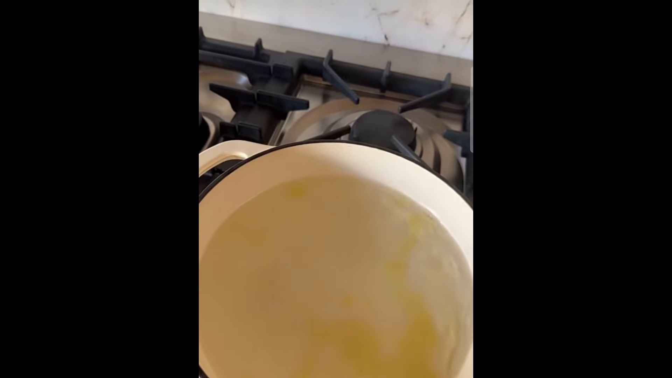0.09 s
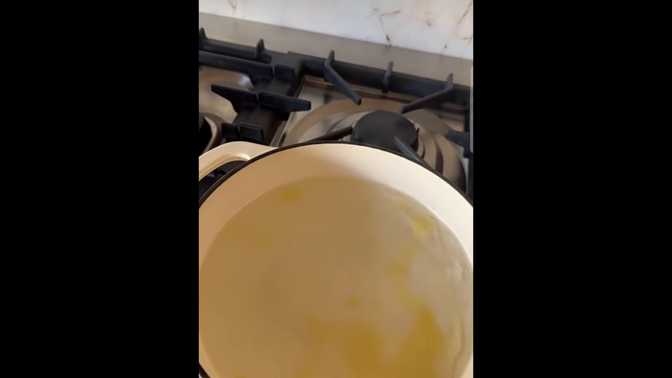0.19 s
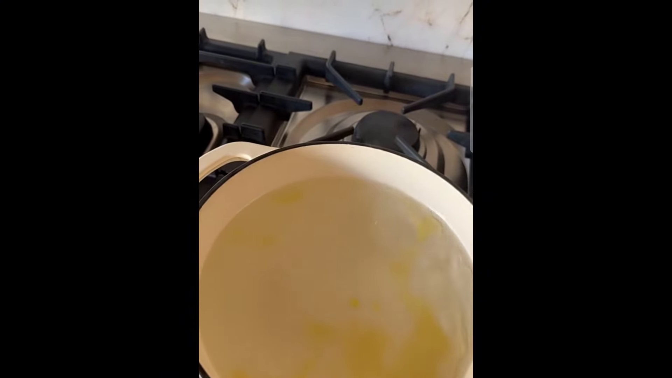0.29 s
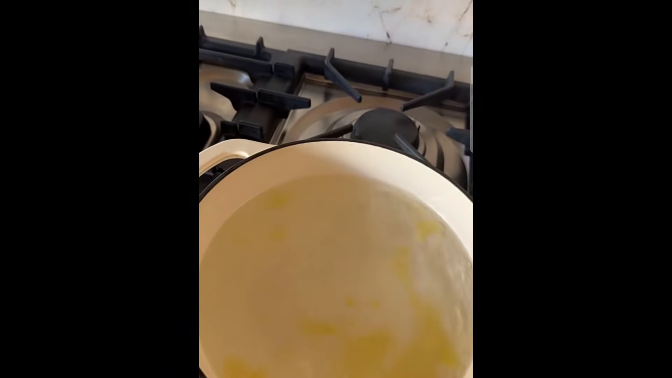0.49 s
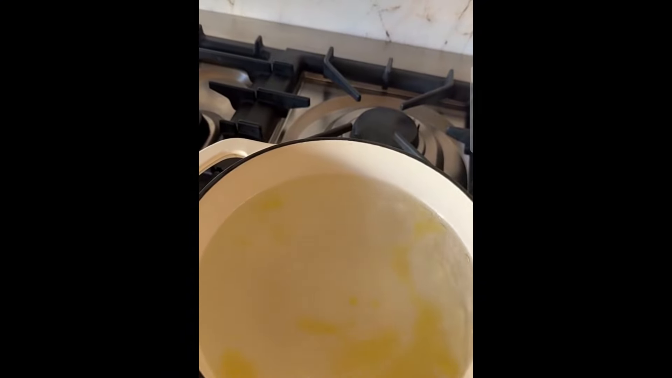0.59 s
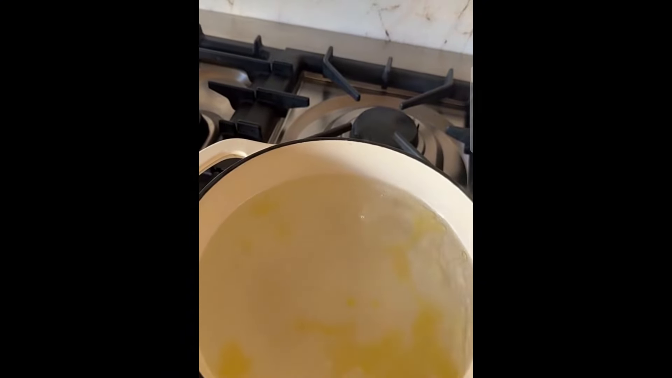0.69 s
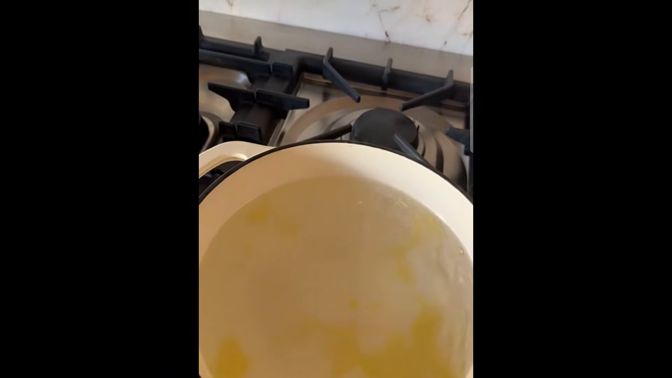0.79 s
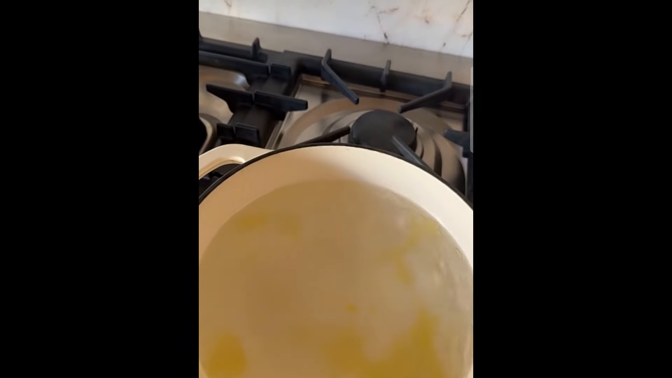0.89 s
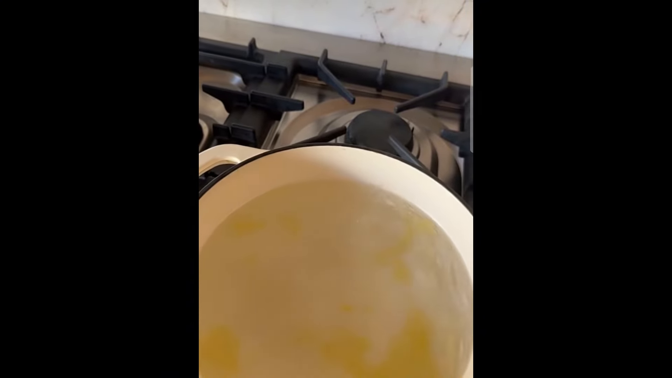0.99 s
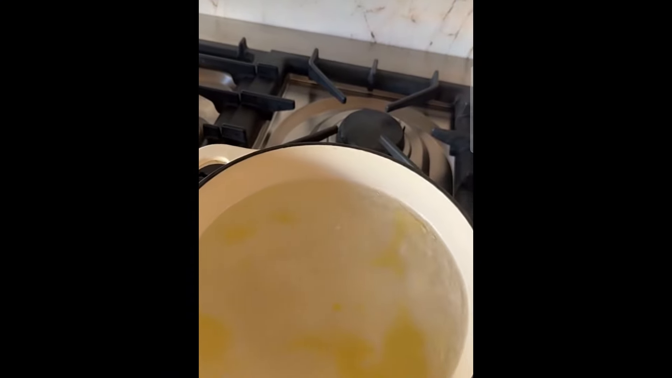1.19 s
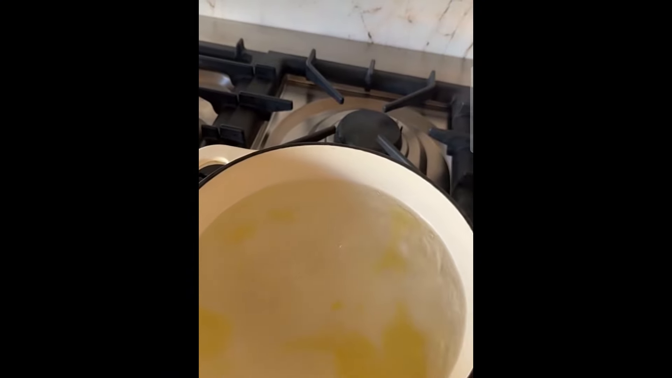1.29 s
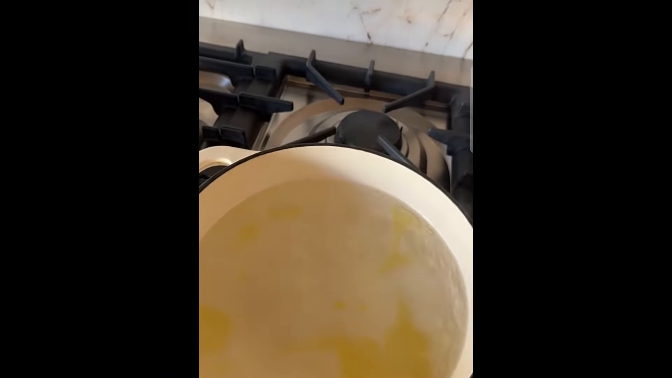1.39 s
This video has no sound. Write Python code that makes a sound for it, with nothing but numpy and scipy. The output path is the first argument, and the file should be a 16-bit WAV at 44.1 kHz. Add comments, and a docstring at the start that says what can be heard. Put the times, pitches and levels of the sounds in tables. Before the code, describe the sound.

A very faint, steady gas flame rush opens. At about 0.25 s a loud, sharp knock lands, full of midrange thud and bright crack, then a duller rebound at 0.32 s. A much softer bump settles at 0.46 s. The hollow ringing and low boom fade in a small kitchen, leaving faint ticks, thin quiet whistles and weak taps near 0.9 and 1.2 s.

```python
"""A lit gas ring is heard first, rushing steadily under a pot in a small kitchen: noise bands and resonances.
A hard object is then knocked down, drops back once and settles with a soft bump: decaying sines for body,
thud and low boom, with shaped noise and crowded tones for crack, dense ringing and room tail.
Light taps, faint high ticks and thin, quiet whistles are resonant noise under envelopes.
One microphone takes it all in; distance is heard only as level and room tail."""
import sys
import numpy as np
from scipy import signal
from scipy.fft import irfft
from scipy.io import wavfile

SR = 44100
rng = np.random.default_rng(int(sys.argv[2]) if len(sys.argv) > 2 else 0)


def master(y):
    """Save y as 16-bit WAV."""
    cut = np.clip(np.atleast_2d(y).T, -1, 1)
    pcm = np.round(cut * 32767)  # scale
    wavfile.write(sys.argv[1], SR, pcm.astype(np.int16))


N = 61740
TIME = np.arange(N) / SR
CENTRES_HZ = 1000 * 2 ** (np.arange(-30, 25) / 6)  # sixth-octave steps

# Gas ring spectrum: [f/Hz, level/dB per third octave]
FLAME = [(30, -93), (50, -66), (80, -57), (125, -58.5), (200, -64), (340, -55), (500, -61.5), (800, -57),
         (1150, -64), (1500, -51), (1900, -56), (2500, -63.5), (3200, -65), (4800, -71.5), (7200, -71.5),
         (10500, -77.5), (15000, -72.5)]
# Resonances in the burner's rush: [f/Hz, filter width/Hz, level/dB]
FLAME_RESONANCES = [(1582, 65, -59), (1903, 49, -58), (5764, 83, -72), (7320, 900, -71.5),
                    (9360, 1200, -75), (13800, 400, -78)]
# Slow drift of the whole rush: [t/s, relative level/dB]
FLAME_LEVEL = [(0, 1), (.5, 1), (.72, 0.5), (.86, -2), (1.0, -1), (1.18, -0.5), (1.27, -1.5), (1.4, -0.5)]
FLAME_FLICKER_DB = 3.08  # standard deviation at each flicker point

# Thin whistles: [middle t/s, length/s, f/Hz, filter width/Hz, level/dB]
WHISTLES = [(0.595, 0.089, 3120, 35, -53), (1.087, 0.22, 3340, 69.4, -60), (1.117, 0.24, 1540, 58.4, -52)]

# Faint ticks: [t/s, snap level/dB, t60/s, high ring level/dB]
TICKS = [(0.683, -44.5, 0.027, -44), (0.7975, -42, 0.01, -57), (1.07, -46, 0.034, -60),
         (1.078, -57, 0.33, -67), (1.1176, -46, 0.053, -43.5), (1.170, -62, 0.044, -56.5),
         (1.259, -55, 0.043, -55), (1.27, -57, 0.15, -61), (1.292, -55, 0.022, -55.5)]
# Colour of the tick's snap: [f/Hz, relative level/dB per third octave]
TICK_COLOUR = [(2000, -26), (3500, -3), (5500, -5), (8000, -1), (11000, -1.5), (15000, 7)]
TICK_RING_HZ, TICK_RING_WIDTH_HZ, TICK_RISE_S = 6930, 510, 0.00047

# Light taps: [t/s, f/Hz, level/dB, t60/s]
TAPS = [(0.463, 850, -33.5, 0.13), (0.889, 862, -41, 0.064), (1.188, 330, -34, 0.084)]
TAP_WIDTH_HZ, TAP_RISE_S = 47, 0.0054

# Blows: [t/s, thud and dense ringing level/dB, contact brightness f/Hz, crack level/dB,
#         mode ring level/dB, boom level/dB]; levels are relative to the tables below
BLOWS = [(0.2474, 1, 14000, 4, 2, 1), (0.3246, -2, 736, 1, -2, -2), (0.4647, -19, 1080, -16.5, -23, -11)]

# Crack of a contact: [f/Hz, level/dB per third octave]
CRACK = [(200, -33), (1000, -21.5), (2300, -32), (3200, -50), (6000, -33), (8000, -36), (15000, -54)]
CRACK_T60_S = 0.014
CRACK_DULL_DB_PER_OCTAVE, CRACK_DULL_FROM_HZ = 8, 4200  # softer, later contacts lose their top

# Dense ringing and room tail: [f/Hz, early level/dB, tail level/dB], per third octave
DENSE = [(40, -67, -78), (133, -31.5, -34), (278, -26, -37.5), (650, -18, -27.5), (1090, -25, -27.5),
         (2120, -21.5, -29), (2445, -16, -30), (2850, -32, -47), (4300, -28, -40.5), (4520, -37, -50.5),
         (5800, -32.5, -52.5), (7270, -46, -53), (9200, -35, -50.5), (10900, -46, -69), (15000, -46, -57)]
# Decay of the kitchen's tail: [f/Hz, t60/s]
ROOM_T60 = [(100, 0.4), (500, 0.67), (1500, 0.33), (4000, 0.82), (12000, 0.63)]
EARLY_T60_S, EARLY_RISE_S, TAIL_RISE_S = 0.13, 0.0027, 0.021
CROWD_SHARE, CROWD_SPREAD_DB = 0.45, 1.5  # power share held in scattered modes; spread of their strengths
BASS_LAG_S, BASS_LAG_BELOW_HZ = 0.00902, 398.3  # slow bending waves delay the bass of the ringing

# Modes of the knocked body: [f/Hz]
MODE_HZ = [239, 347, 468, 571, 613, 639, 783, 820, 970, 1372, 1753, 1906, 2238, 3812, 4027, 4288, 5250,
           5997]
# Strength and decay of those modes, in turn: [first blow level/dB, later blow level/dB, t60/s]
MODES_OF_BODY = [(-24.5, -36, 0.073), (-22, -17.5, 0.12), (-19.5, -20, 0.2), (-44, -41, 0.15),
                 (-17.5, -42, 0.48), (-33, -19.5, 0.37), (-27.5, -20.5, 0.34), (-14, -32, 0.1),
                 (-31, -29, 0.25), (-24, -23, 0.28), (-35, -29, 0.21), (-17, -30, .24), (-43.5, -57, 0.53),
                 (-40, -58, 0.2), (-33, -62, 0.15), (-26.5, -36, 0.11), (-37, -45, 0.13),
                 (-23.5, -58, 0.051)]
# Short, broad thud whose low waves arrive later: [f/Hz, first blow level/dB, later blow level/dB, t60/s, lag/s]
THUD = [(238.5, -2, -13.5, 0.027, 0.00695), (336.6, -0.5, 3, 0.032, 0.0061), (553, -5, 5.5, 0.014, 0.0019),
        (864, -6, -38, 0.013, 0.00061), (1796, 1, -27, 0.0074, 0.00026), (2310, -5, -33, 0.0072, .0002)]
THUD_RISE_CYCLES = 1.42
# Low boom that builds up slowly: [f/Hz, level/dB, t60/s]
BOOM = [(82, -7, 0.17), (94.44, -15, 0.35)]
BOOM_RISE_S = 0.05

CUTOFF_HZ = 15900


def from_db(db):
    """Decibels to gain."""
    return 10 ** (np.asarray(db) / 20)


def rms_one(x):
    """Scale to unit power."""
    return x / np.sqrt(np.mean(x ** 2) + 1e-20)


def at_hz(points, hz, column=1):
    """Read a table on a log-frequency axis."""
    table = np.array(points)
    return np.interp(np.log(hz), np.log(table[:, 0]), table[:, column])


def band_noise(low, high):
    """Steep-sided noise between two edges, rms 1."""
    sos = signal.butter(3, [low, high], "band", fs=SR, output="sos")
    # the extra half second lets the filter settle
    return rms_one(signal.sosfilt(sos, rng.standard_normal(N + SR // 2))[-N:])


def noise_bands():
    """Noise in sixth-octave bands with their centres; unit power per third octave."""
    half_band = 2 ** (1 / 12)
    return [(hz, band_noise(hz / half_band, hz * half_band) / np.sqrt(2)) for hz in CENTRES_HZ]


def resonant_noise(hz, width_hz):
    """Noise twice through one resonance, rms 1."""
    b, a = signal.iirpeak(hz, hz / width_hz, fs=SR)
    once = signal.lfilter(b, a, rng.standard_normal(N))
    return rms_one(signal.lfilter(b, a, once))


def decay(start, t60, rise=1e-4):
    """Envelope that rises with a time constant (s) and dies away by 60 dB per t60 (s)."""
    age = np.maximum(TIME - start, 0)
    return (1 - np.exp(-age / rise)) * from_db(-60 * age / t60)


def ring(start, hz, t60, rise=1e-4):
    """One struck mode: a decaying sine."""
    return np.sin(2 * np.pi * hz * (TIME - start)) * decay(start, t60, rise)


def flame():
    """The burner's rush: noise flickering separately in every band, plus steady resonances."""
    rush = np.zeros(N)
    flicker_times = np.linspace(0, N / SR, num=30)
    for hz, noise in noise_bands():
        flicker = np.interp(TIME, flicker_times, rng.standard_normal(size=30))
        rush += from_db(at_hz(FLAME, hz) + FLAME_FLICKER_DB * flicker) * noise
    for hz, width_hz, db in FLAME_RESONANCES:
        rush += from_db(db) * resonant_noise(hz, width_hz)
    return rush * from_db(np.interp(TIME, *np.transpose(FLAME_LEVEL)))


def whistles():
    """Thin whistles: narrow resonant noise that swells and fades on half a cosine."""
    out = np.zeros(N)
    for middle, length, hz, width_hz, db in WHISTLES:
        swell = np.cos(np.pi * np.clip((TIME - middle) / length, -.5, .5))
        out += from_db(db) * swell * resonant_noise(hz, width_hz)
    return out


def ticks():
    """Tiny bright snaps of coloured noise, each with a short, high resonance."""
    snap = np.zeros(N)
    for hz, noise in noise_bands():
        if hz >= TICK_COLOUR[0][0]:
            snap += from_db(at_hz(TICK_COLOUR, hz)) * noise
    snap = rms_one(snap)
    high_ring = resonant_noise(TICK_RING_HZ, TICK_RING_WIDTH_HZ)
    out = np.zeros(N)
    for s, db, t60, ring_db in TICKS:
        out += decay(s, t60, TICK_RISE_S) * (from_db(db) * snap + from_db(ring_db) * high_ring)
    return out


def taps():
    """Small dull contacts, each a decaying burst of noise through one resonance."""
    out = np.zeros(N)
    for s, hz, db, t60 in TAPS:
        out += from_db(db) * decay(s, t60, TAP_RISE_S) * resonant_noise(hz, TAP_WIDTH_HZ)
    return out


def contact(hz, bright_hz):
    """A softer contact excites less treble."""
    return 1 / np.sqrt(1 + (hz / bright_hz) ** 4)


def bass_lag(hz):
    """How much later (s) the ringing sets in at this frequency: slow bending waves delay the bass."""
    return BASS_LAG_S / np.sqrt(1 + (hz / BASS_LAG_BELOW_HZ) ** 4)


def mode_crowd(centre_hz, count=6):
    """A few steady tones scattered over one band, with the power of that band's noise."""
    spectrum = np.zeros(N // 2 + 1, complex)
    hz = centre_hz * 2 ** (rng.uniform(-1, 1, count) / 12)
    strength = from_db(CROWD_SPREAD_DB * rng.standard_normal(count))
    phase = 2 * np.pi * rng.random(count)
    spectrum[(hz * N / SR).astype(int)] = strength * np.exp(1j * phase)
    return rms_one(irfft(spectrum, N)) / np.sqrt(2)


def clatter():
    """Cracks of contact, the crowd of short modes and the kitchen's tail; ringing of the blows adds in power."""
    out = np.zeros(N)
    earlies = [decay(s, EARLY_T60_S, EARLY_RISE_S) for s, *_ in BLOWS]
    cracks = [from_db(crack_db) * decay(s, CRACK_T60_S) for s, _, _, crack_db, _, _ in BLOWS]
    first_crack, *later_cracks = cracks
    for hz, noise in noise_bands():
        octaves_above = max(np.log2(hz / CRACK_DULL_FROM_HZ), 0)
        dull = from_db(-CRACK_DULL_DB_PER_OCTAVE * octaves_above)
        crack = from_db(at_hz(CRACK, hz)) * (first_crack + dull * sum(later_cracks))

        ringing_power = 0
        for (s, db, bright_hz, *_), early_envelope in zip(BLOWS, earlies):
            strike = from_db(db) * contact(hz, bright_hz)
            early = from_db(at_hz(DENSE, hz)) * early_envelope
            tail = from_db(at_hz(DENSE, hz, column=2)) * decay(s, at_hz(ROOM_T60, hz), TAIL_RISE_S)
            ringing_power += strike ** 2 * (early ** 2 + tail ** 2)
        ringing_power = np.interp(TIME - bass_lag(hz), TIME, ringing_power)

        out += mode_crowd(hz) * np.sqrt(CROWD_SHARE * ringing_power)
        out += noise * np.sqrt((1 - CROWD_SHARE) * ringing_power + crack ** 2)
    return out


def body():
    """Every blow sets off the modes, the thud and the boom as decaying sines; later blows land on another spot."""
    out = np.zeros(N)
    for k, (s, db, _, _, ring_db, boom_db) in enumerate(BLOWS):
        # neighbouring modes start with opposite signs
        for j, (hz, (first_db, later_db, t60)) in enumerate(zip(MODE_HZ, MODES_OF_BODY)):
            mode_db = later_db if k else first_db
            out += (-1) ** j * from_db(ring_db + mode_db) * ring(s + bass_lag(hz), hz, t60)
        for j, (hz, first_db, later_db, t60, lag) in enumerate(THUD):
            thud_db = later_db if k else first_db
            out += (-1) ** j * from_db(db + thud_db) * ring(s + lag, hz, t60, THUD_RISE_CYCLES / hz)
        for j, (hz, mode_db, t60) in enumerate(BOOM):
            out += (-1) ** j * from_db(boom_db + mode_db) * ring(s, hz, t60, BOOM_RISE_S)
    return out


def scene():
    """All sources in the kitchen, summed at one microphone."""
    return (flame() + whistles() + ticks() + taps() + clatter() + body())[None]


def record(dry):
    """The loudest peaks are rounded towards 0.9 of full scale and the top is cut steeply."""
    rounded = dry / (1 + (dry / .9) ** 6) ** (1 / 6)
    top_cut = signal.ellip(12, .1, 80, CUTOFF_HZ, fs=SR, output="sos")
    return signal.sosfilt(top_cut, rounded)


dry = scene()
out = record(dry)
master(out)
```